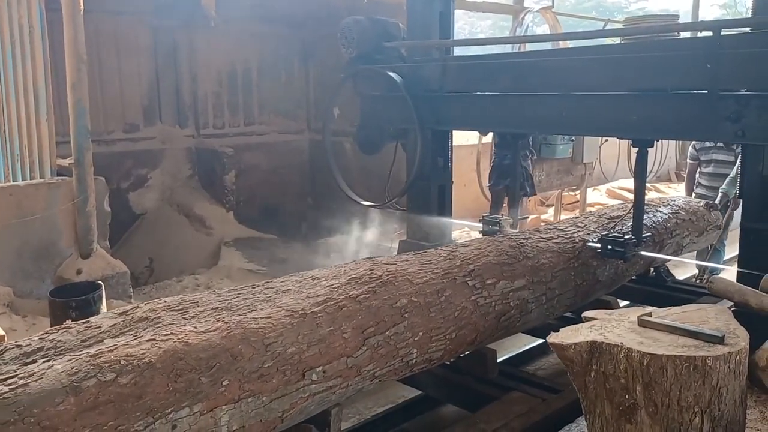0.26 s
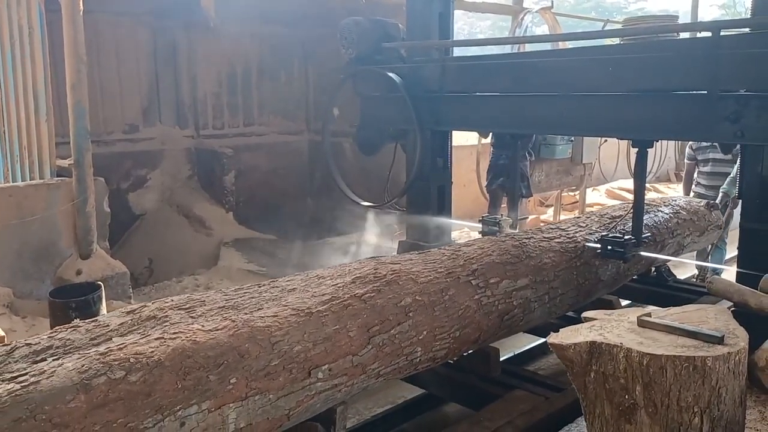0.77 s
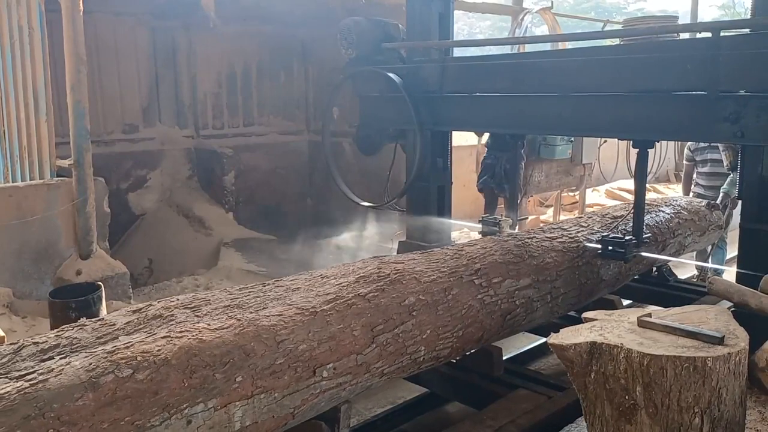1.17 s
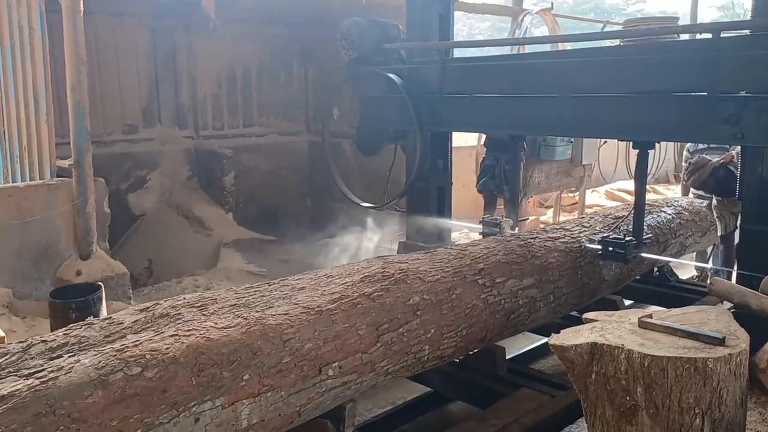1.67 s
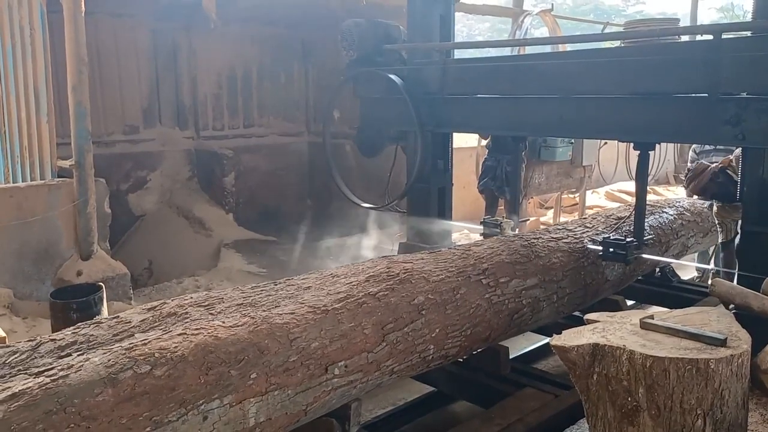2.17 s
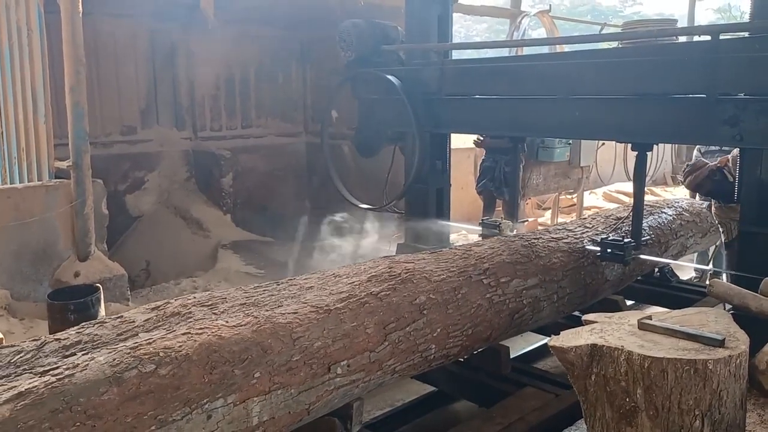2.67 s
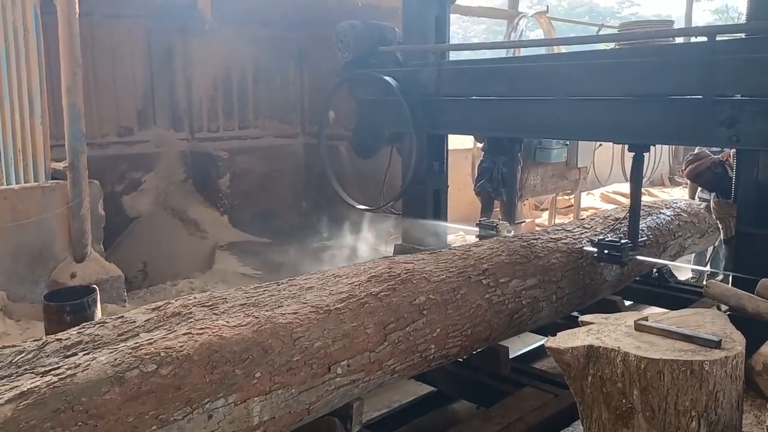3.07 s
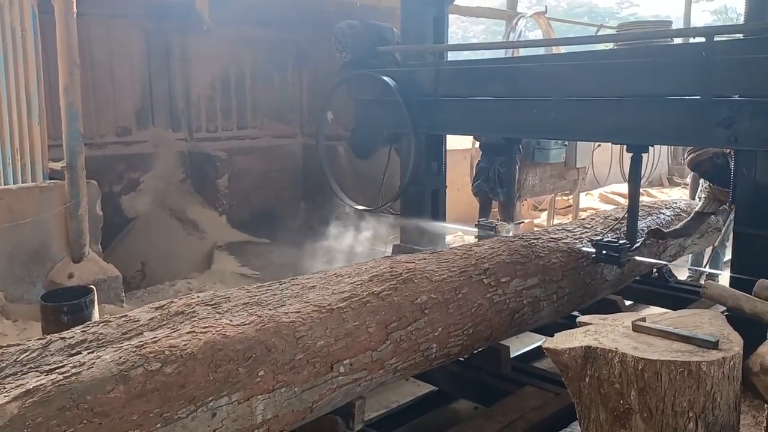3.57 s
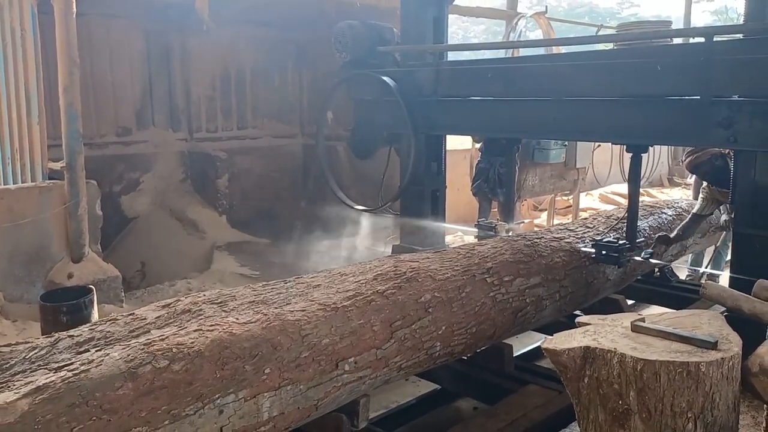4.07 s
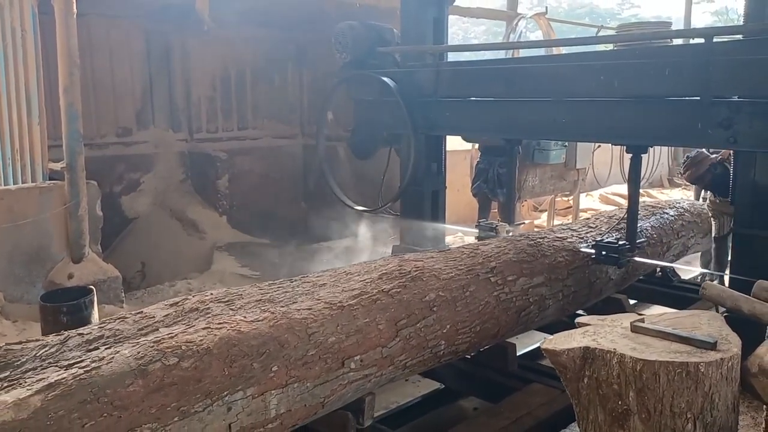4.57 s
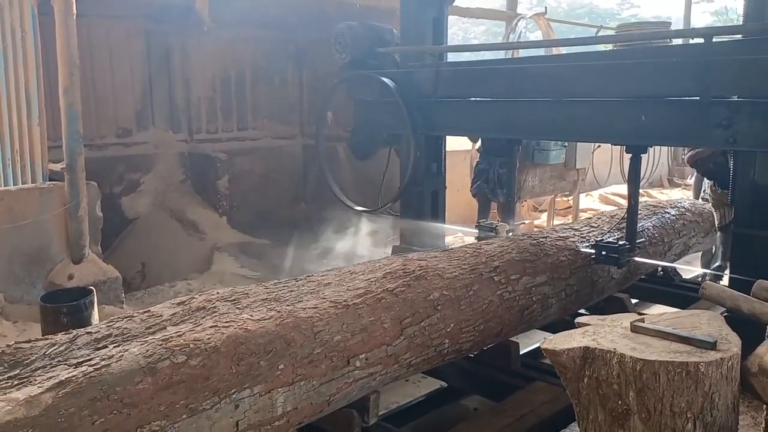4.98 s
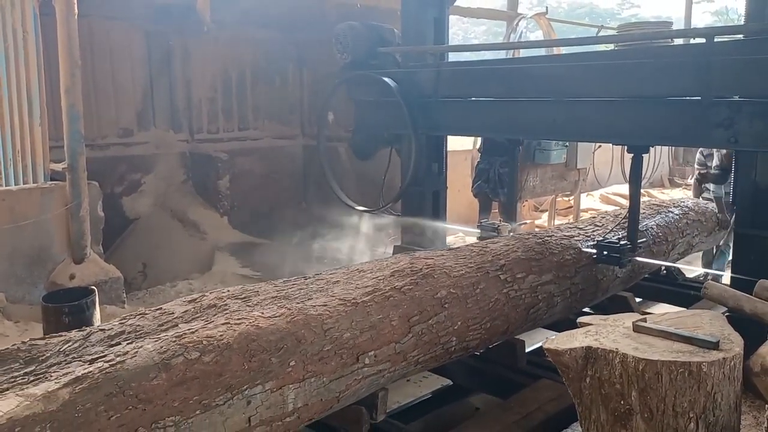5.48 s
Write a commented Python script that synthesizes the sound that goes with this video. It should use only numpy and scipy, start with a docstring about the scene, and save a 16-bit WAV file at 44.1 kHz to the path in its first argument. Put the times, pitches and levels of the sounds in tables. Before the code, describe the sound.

A band saw cuts a log with a piercing, pulsing squeal and hiss, then eases at 3.8 seconds into a fuller hum and rushing spray.

```python
"""A horizontal band saw rips along a log in an open shed, heard at two microphone ports a few metres off.
At first toothed-band noise hisses and friction-driven blade modes squeal and whistle, swelling and bending
each lap, while eddies buffet the right port; at 3.8 s the bite eases, squeal and puffs stop, and a spray
of high noise and tooth harmonics runs on with a thin whine that swells now and then.
Throughout, the drive rumbles and hums, its wheels drone as randomly struck modes, and the blade rushes."""
import sys
import numpy as np
from scipy import signal
from scipy.fft import rfft, irfft
from scipy.io import wavfile
from scipy.ndimage import uniform_filter1d, minimum_filter1d, map_coordinates

SR = 44100
rng = np.random.default_rng(int(sys.argv[2]) if len(sys.argv) > 2 else 0)


def log_audio(samples):
    """Write samples as a 16-bit WAV file to the path given in sys.argv[1]."""
    # one column per channel
    frames = np.atleast_2d(samples).T
    # limit to full scale, then quantise
    limited = np.clip(frames, -1, 1)
    pcm = np.round(limited * 32767).astype(np.int16)
    wavfile.write(sys.argv[1], SR, pcm)


N = 253121
T = np.arange(N) / SR
FREQS = np.fft.rfftfreq(N, 1 / SR)

# Hiss of the biting teeth. Each row: frequency in Hz, relative density in dB per Hz.
TEETH_SPECTRUM = [(5000, -70), (8500, -34), (9300, -26), (10350, -20), (10550, -15), (10900, -15),
                  (11150, -5), (11600, 0), (12100, -1), (12400, -5), (13250, -4), (14400, -17),
                  (15700, -22), (16200, -60)]
# Blade modes around the squeal. Each row: centre in Hz, half width in Hz, level in dB within the squeal mix.
RASP_MODES = [(11900, 7, -11), (11600, 41, -13.5), (11280, 18, -13), (11350, 17, -10)]
# Blade modes beside the whistle. Each row: centre in Hz, half width in Hz, relative level in dB.
SIDE_MODES = [(3794, 20, -17), (4380, 40, -13), (4500, 130, -6), (4615, 25, -4), (4658, 20, 0),
              (4945, 100, -2)]
SQUEAL_HZ, WHISTLE_HZ = 11345, 4517  # mean pitches of the self-excited modes


def biting_blade():
    """Teeth hiss through the wood; friction makes the band squeal and whistle, tension bends the pitches."""
    squeal_db, whistle_db, teeth_db, side_db = bite()
    teeth = noise(TEETH_SPECTRUM) * undb(teeth_db + 8 + 1.2 * walk(42))

    # neighbouring modes beat against the tone and make it rasp
    tone = sing(SQUEAL_HZ, waver_hz=19.8, waver_rate_hz=91, flutter_db=4.0, flutter_rate_hz=166)
    squeal = undb(2.0) * tighten(tone, 0.0023)
    squeal = squeal + modes(RASP_MODES)
    squeal = squeal + undb(-6.0) * tighten(ring(SQUEAL_HZ, 160), 0.00793)

    whistle = sing(WHISTLE_HZ, waver_hz=9, waver_rate_hz=50, flutter_db=2.6, flutter_rate_hz=60)
    whistle = tighten(whistle, 0.002)
    # the mode takes 15 ms to build up and die away
    whistle_gain = uniform_filter1d(undb(whistle_db + 5), size=int(.015 * SR))

    side = modes(SIDE_MODES) * undb(side_db + 5)
    return tighten(teeth, 0.00625) + undb(squeal_db + 5.5) * squeal + whistle_gain * whistle + side


# The blade under load. Each row: time in seconds, relative levels of squeal, whistle and side modes in dB,
# unevenness of the bite (1 = usual).
BITE = [(0, -21.5, -43.5, -50, 0.24), (.7, -22, -37.5, -39, 0.99), (1.0, -23.5, -32.5, -34.5, 0.35),
        (1.7, -24.5, -33, -36, 0.94), (2.15, -24, -35.5, -34, 1.7), (2.65, -23, -34, -35, 1.16),
        (3.15, -21.5, -33, -40.5, 1), (3.74, -19.3, -32.5, -39.5, 1.7), (3.82, -29, -48, -35, 0.87)]
# Stretches of band that return each lap. Each row: centre in seconds into the lap, Gaussian sigma in seconds,
# changes of squeal, whistle and tooth hiss in dB.
STRETCHES = [(0.053, 0.01, -9.5, -7, -2.5), (0.162, 0.012, -3, 10, -0.7), (0.283, 0.037, -2.5, 0, -.8)]
# Wood pinches the band and the whistle holds on. Each row: centre in seconds, Gaussian sigma in seconds,
# relative whistle level in dB.
PINCHES = [(.45, .015, -25.5), (1.42, .025, -26.5), (2.135, 0.073, -23.5), (2.423, 0.043, -26.5),
           (2.537, 0.029, -27.5), (2.792, 0.035, -31.5)]
TEETH_DB = -22.5  # relative, before the stretches
SQUEAL_GRAIN_DB, WHISTLE_GRAIN_DB, GRAIN_RATE_HZ = 1.85, 3, 26  # wander from the grain of the wood
LAP_RATE_HZ, TIGHTEST_S = 3.475, .13  # laps of the band, a moment of highest tension


def bite():
    """Relative dB of squeal, whistle, tooth hiss and side modes: band stretches recur, wood grain wanders."""
    squeal_db, whistle_db, side_db, uneven = curves(BITE)
    teeth_db, lap_s = TEETH_DB, 1 / LAP_RATE_HZ
    for centre_s, sigma_s, squeal, whistle, teeth in STRETCHES:
        age_s = (T - centre_s + lap_s / 2) % lap_s - lap_s / 2
        in_wood = swell_of(age_s, sigma_s)
        squeal_db = squeal_db + squeal * uneven * in_wood
        whistle_db = whistle_db + whistle * in_wood
        teeth_db = teeth_db + teeth * uneven * in_wood
    squeal_db = squeal_db + SQUEAL_GRAIN_DB * uneven * walk(GRAIN_RATE_HZ)
    whistle_db = whistle_db + WHISTLE_GRAIN_DB * walk(GRAIN_RATE_HZ)
    pinched = swells(PINCHES)
    whistle_db = 20 * np.log10(np.hypot(undb(whistle_db), pinched))
    return squeal_db, whistle_db, teeth_db, side_db


def tighten(x, depth):
    """Band tension rises and falls once a lap and bends pitch by the share depth, through a moving read point."""
    turn = 2 * np.pi * LAP_RATE_HZ
    place_s = T + depth * np.sin(turn * (T - TIGHTEST_S)) / turn
    return map_coordinates(x, [place_s * SR], order=5, mode="mirror")


# Blade rush in the guides. Each row: frequency in Hz, relative density in dB per Hz.
RUSH_SPECTRUM = [(200, -80), (1300, -21), (2000, -13.5), (3300, -13.5), (4100, -11), (4250, -6.5),
                 (4380, 0), (5500, 0), (5900, -3.5), (6850, -5), (7400, -15), (8100, -19), (11000, -30),
                 (16000, -70)]
# Spray hiss. Each row: frequency in Hz, relative density (gain for the tooth harmonics) in dB.
SPRAY_SPECTRUM = [(5000, -70), (8000, -24), (9200, -17), (10900, -10), (11130, -1), (12600, 1), (13300, -1),
                  (14000, -4), (15000, -11), (15700, -14), (16200, -60)]
# Spray of the easy-running blade. Each row: time in seconds, relative level in dB.
SPRAY_LEVEL = [(3.83, -31.5), (3.96, -30), (4.9, -31), (5.2, -27.5), (5.74, -27.5)]
# Swells of the tooth whine. Each row: centre in seconds, Gaussian sigma in seconds, added level in dB.
WHINES = [(3.98, 0.07, -49), (5.05, 0.089, -42), (5.24, .02, -45), (5.62, .06, -44)]
TOOTH_HZ, WHINE_DB = 700, -49  # mean rate of teeth at the guide, steady whine of the easy-running blade


def running_blade(rush_db, load):
    """The band rushes through its guides; as load falls, passing teeth colour a spray hiss and whine."""
    rush = noise(RUSH_SPECTRUM) * undb(rush_db + 9.5 + (0.77 + .5 * load) * walk(13.5))

    # uneven passing smears the high tooth harmonics into bumps
    turns = np.cumsum(TOOTH_HZ * (1 + .007 * walk(120))) / SR
    harmonics = (np.cos(2 * np.pi * (k * turns + rng.random())) for k in range(14, 21))
    passing = unit(sum(harmonics))
    spray = noise(SPRAY_SPECTRUM) + undb(-6) * unit(colour(passing, SPRAY_SPECTRUM))
    spray_db, = curves(SPRAY_LEVEL)
    spray_gain = np.sqrt(1 - load) * undb(spray_db + 8.5 + 0.49 * walk(25))

    whine_gain = undb(WHINE_DB) * (1 - load) + swells(WHINES)
    whine = sing(4 * TOOTH_HZ, waver_hz=20, waver_rate_hz=60, flutter_db=3, flutter_rate_hz=50)
    return rush + spray_gain * spray + whine_gain * whine


# Strongest air puffs. Each row: time in seconds, relative levels of crest and bass in dB.
PUFFS = [(0.488, -34, -33), (0.738, -27, -40), (0.79, -26, -33), (1.025, -31, -40), (1.05, -27, -39),
         (1.075, -37, -32.5), (1.317, -39, -32.5), (1.344, -34, -39), (1.589, -37, -35), (1.618, -30, -34),
         (1.643, -25.5, -28.5), (1.934, -31.5, -31.5), (2.224, -27.5, -60), (2.524, -25.5, -34),
         (3.078, -33, -39), (3.365, -25, -29), (3.38, -37, -32.5), (3.541, -28, -42), (3.642, -28, -39),
         (3.74, -28, -52)]
# Noise in an eddy's crest. Each row: frequency in Hz, relative density in dB per Hz.
PUFF_SPECTRUM = [(20, -45), (60, -7), (110, 3.5), (260, -1.5), (450, -6.5), (1200, -10.5), (3000, -27.5),
                 (6000, -42)]
# Response of the port to an eddy's push. Each row: frequency in Hz, gain in dB.
EDDY_RESPONSE = [(20, -24), (45, -51), (80, -5), (2000, 13)]


def puffs(load):
    """Eddies hit the port: each a push and pull of pressure with a sharp noisy crest, over light buffeting."""
    push, crest = np.zeros(N), np.zeros(N)
    eddies = list(PUFFS) + faint_puffs(count=12)
    for start_s, crest_db, bass_db in eddies:
        age_s = T - start_s - .002
        push_scale_s = .0017 * np.exp(.15 * rng.standard_normal())
        x = age_s / push_scale_s
        push -= undb(bass_db + 16) * x * np.exp(-np.minimum(x ** 2 / 2, 50))
        crest_scale_s = np.where(age_s < 0, .0012, .004)  # fast rise, slower fall
        crest += undb(crest_db + 2.5) * np.exp(-np.minimum(np.abs(age_s) / crest_scale_s, 50))
    buffet = load * undb(-42.5 + 1.8 * walk(29))
    return colour(push, EDDY_RESPONSE) + (crest + buffet) * noise(PUFF_SPECTRUM)


FAINT_CREST_DB, FAINT_BASS_DB, FAINT_SCATTER_DB = -46, -46, 1.5  # median relative levels, spread


def faint_puffs(count):
    """Small eddies at random times of the bite, as rows like PUFFS."""
    times_s = rng.random(count) * LOAD[0][0]
    sizes_db = FAINT_SCATTER_DB * rng.standard_normal(count)
    return [(s, FAINT_CREST_DB + db, FAINT_BASS_DB + db) for s, db in zip(times_s, sizes_db)]


# Drive rumble. Each row: frequency in Hz, relative density in dB per Hz.
DRIVE_SPECTRUM = [(20, -40), (50, -27), (75, -19), (100, -8), (125, -4), (175, -6), (210, 0), (300, -3),
                  (450, -11), (560, -16), (700, -13), (950, -14), (1300, -20), (1900, -19), (2400, -40),
                  (5000, -100)]
# Motor and belt tones. Each row: centre in Hz, half width in Hz, relative level in dB.
HUM = [(115.2, 2.3, -14), (200, 7.3, -21.5), (214.8, 14.2, -7), (237.1, 19.5, -8), (495.5, 3.6, -23.5),
       (678, 2, -21.5)]
# Ringing of the band wheels. Each row: centre in Hz, half width in Hz, relative level in dB.
WHEELS = [(1016, 9, -8.5), (1066.5, 6, -7.5), (1121.5, 6, -7.5), (1146, 14, -10), (1172, 16, -13),
          (1857, 12, -13), (1940, 12, -12), (2676, 14, -19)]
PORT_LAG_S = .00034


def drive(drive_db, drone_db):
    """Motor rumble and ringing wheels reach the left port later, plus diffuse shed sound unlike at each."""
    def field():
        rumble = undb(3.0) * noise(DRIVE_SPECTRUM) + undb(3.5) * modes(HUM)
        return undb(drive_db) * rumble + undb(drone_db + 5.5) * modes(WHEELS)
    direct = field()
    ports = np.interp(T - PORT_LAG_S, T, direct), direct
    return [port + undb(-9.5) * field() for port in ports]


def sing(hz, waver_hz, waver_rate_hz, flutter_db, flutter_rate_hz):
    """A self-excited tone of rms 1: friction changes waver its pitch and flutter its level (rms depths)."""
    phase = 2 * np.pi * np.cumsum(hz + waver_hz * walk(waver_rate_hz)) / SR
    return unit(np.sin(phase) * undb(flutter_db * walk(flutter_rate_hz)))


def ring(hz, half_width_hz):
    """A mode of rms 1 kept ringing by random blows, 6 dB down at half_width_hz from its centre."""
    blows = rng.standard_normal(N) + 1j * rng.standard_normal(N)
    offset = np.fft.fftfreq(N, 1 / SR) / half_width_hz
    envelope = np.fft.ifft(np.fft.fft(blows) / (1 + 1j * offset) ** 2)
    carrier = np.exp(2j * np.pi * np.cumsum(hz + 0 * T) / SR)
    return unit(np.real(envelope * carrier))


def modes(table):
    """Sum of randomly driven modes."""
    return sum(undb(db) * ring(hz, half_width_hz) for hz, half_width_hz, db in table)


def swell_of(age_s, sigma_s):
    """A Gaussian rise and fall, 1 at age 0."""
    return np.exp(-np.minimum((age_s / sigma_s) ** 2 / 2, 50))


def swells(table):
    """Gain summed over Gaussian swells."""
    return sum(undb(db) * swell_of(T - centre_s, sigma_s) for centre_s, sigma_s, db in table)


def walk(rate_hz):
    """Smooth random control of rms 1: noise low-passed to half amplitude at rate_hz."""
    return unit(irfft(rfft(rng.standard_normal(N)) / (1 + (FREQS / rate_hz) ** 4), N))


def noise(points):
    """Noise of rms 1 with the given spectrum."""
    return unit(colour(rng.standard_normal(N), points))


def colour(x, points):
    """Filter by (Hz, dB) points, joined along log frequency."""
    hz, db = np.transpose(points)
    gain_db = np.interp(np.log(FREQS + 1), np.log(hz), db)
    return irfft(rfft(x) * undb(gain_db), N)


def curves(table):
    """Each column after the time as a control signal."""
    s, *columns = np.transpose(table)
    return [np.interp(T, s, column) for column in columns]


def unit(x):
    """Scale to rms 1."""
    return x / np.sqrt(np.mean(np.abs(x) ** 2))


def undb(db):
    """Decibels to gain."""
    return 10 ** (np.asarray(db) / 20)


# Load on the blade. Each row: time in seconds, share of the full bite from 0 to 1.
LOAD = [(3.76, 1), (3.8, .3), (3.83, 0)]
# Steady running. Each row: time in seconds, relative levels of drive, wheel drone and blade rush in dB.
RUN = [(0, -45.5, -51.5, -37), (.7, -45, -45.5, -36.5), (1.55, -46.5, -54, -36), (2.38, -46, -48.5, -36),
       (3.2, -44.5, -54, -36.5), (3.72, -43, -51.5, -36), (4.05, -39.5, -43.5, -34.5),
       (4.85, -39.5, -41.5, -34), (5.1, -38, -40, -31.5), (5.55, -36, -40, -29),
       (5.74, -35.3, -39.5, -30.5)]
# Muffled left port. Each row: frequency in Hz, gain in dB.
LEFT_PORT = [(30, -2), (200, -2), (500, -5.5), (850, 2), (1150, -3), (1400, -10), (2000, -15),
             (2400, -22.5), (4000, -26), (4700, -35), (7000, -42), (10000, -27), (11400, -34.5),
             (13000, -58), (15500, -46)]


def scene():
    """The saw at both ports (left, right); only the right is open to the treble and the moving air."""
    drive_db, drone_db, rush_db = curves(RUN)
    load = np.clip(curves(LOAD)[0], 0, 1)

    def blade():
        return np.sqrt(load) * biting_blade() + running_blade(rush_db, load)

    drive_left, drive_right = drive(drive_db, drone_db)
    # blade sound arrives from all round the shed, unrelated at the two ports
    blade_left, blade_right = blade(), blade()
    left = colour(drive_left + blade_left, LEFT_PORT)
    right = drive_right + blade_right + puffs(load)
    return np.array([left, right])


TOP_HZ = 15700


def record(dry):
    """Duck the highest peaks of both channels together, then cut steeply above TOP_HZ."""
    headroom = np.minimum(1, .88 / (np.abs(dry).max(axis=0) + 1e-9))
    gain = uniform_filter1d(minimum_filter1d(headroom, size=129), size=129)
    top_cut = signal.ellip(14, .1, 90, TOP_HZ, fs=SR, output="sos")
    return signal.sosfilt(top_cut, dry * gain)


dry = scene()
out = record(dry)
log_audio(out)
```